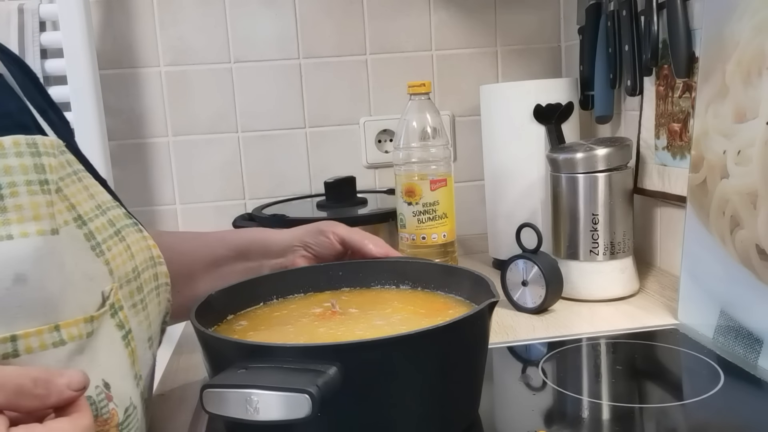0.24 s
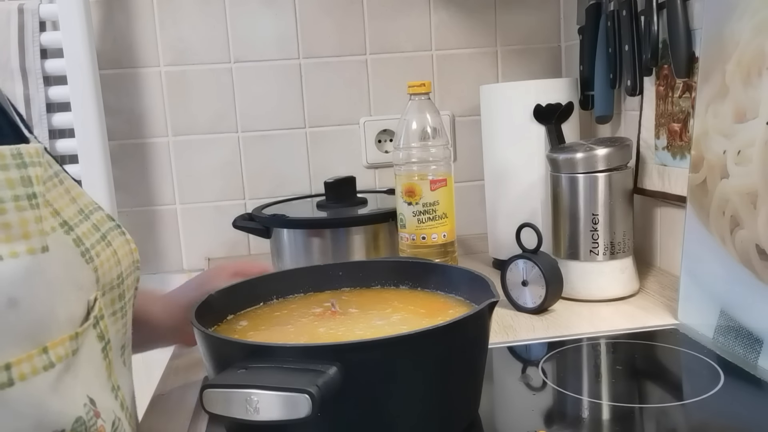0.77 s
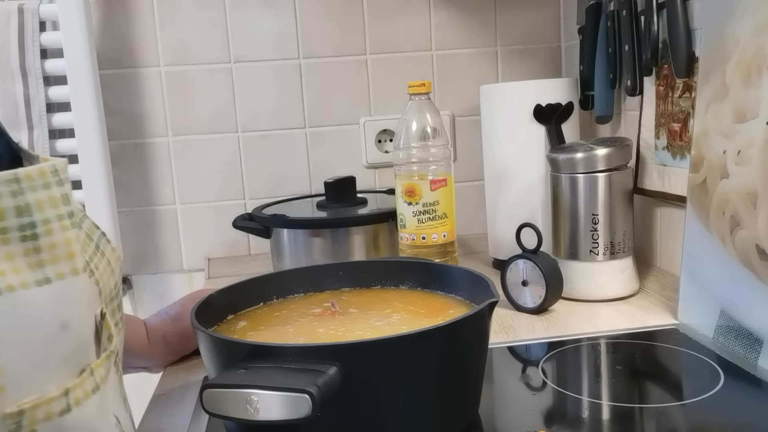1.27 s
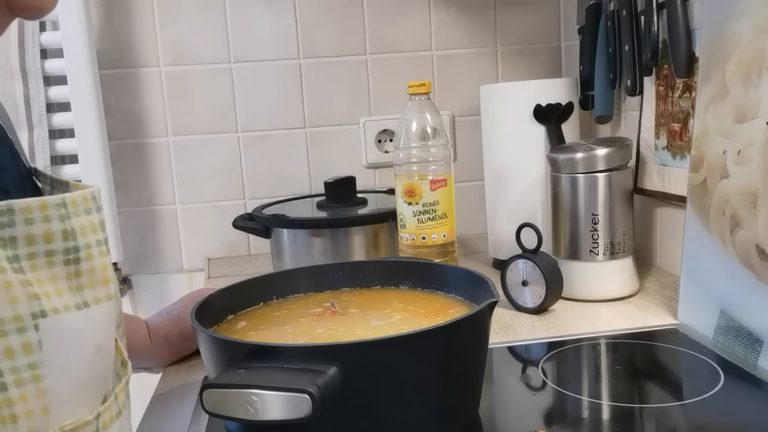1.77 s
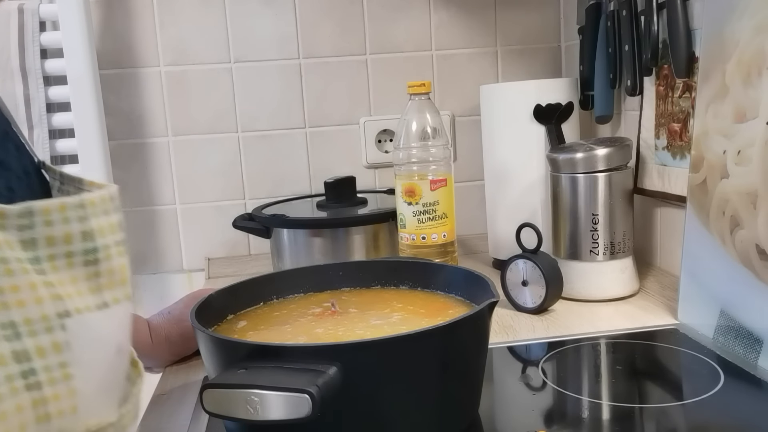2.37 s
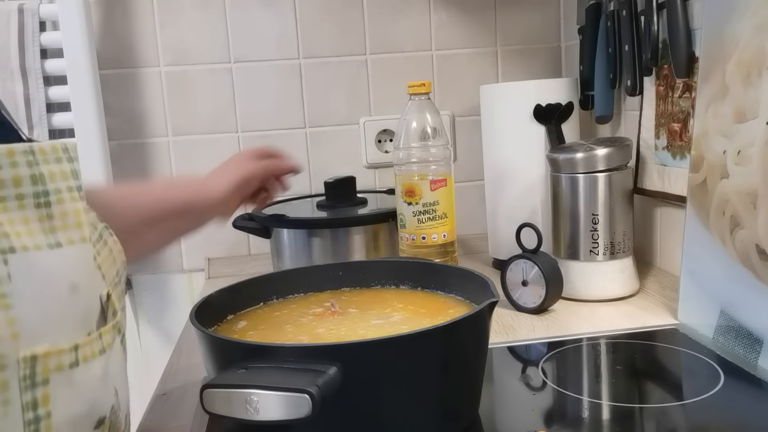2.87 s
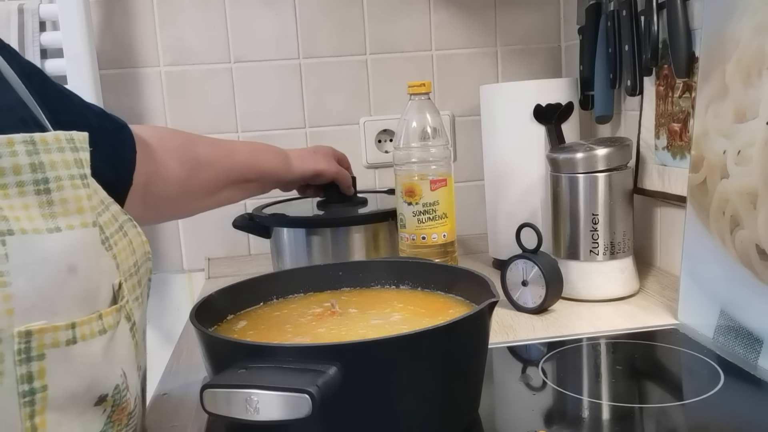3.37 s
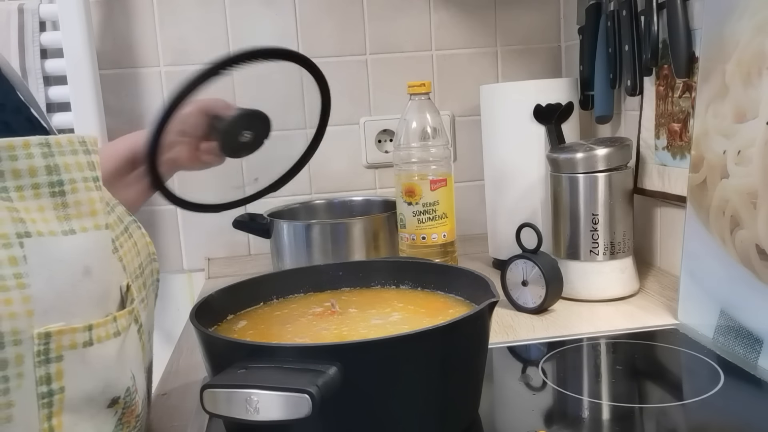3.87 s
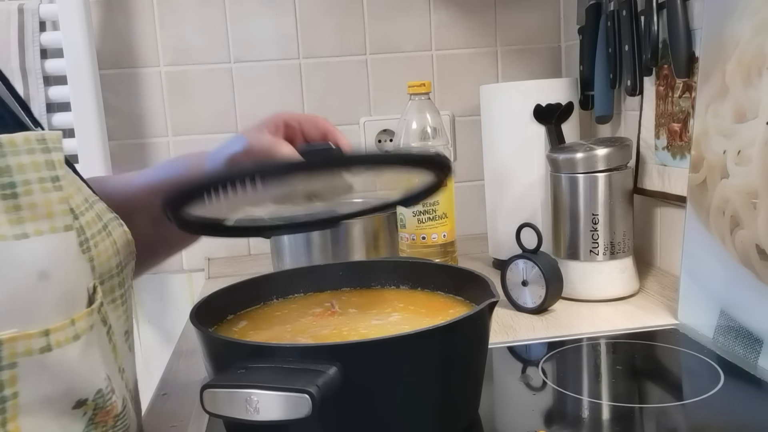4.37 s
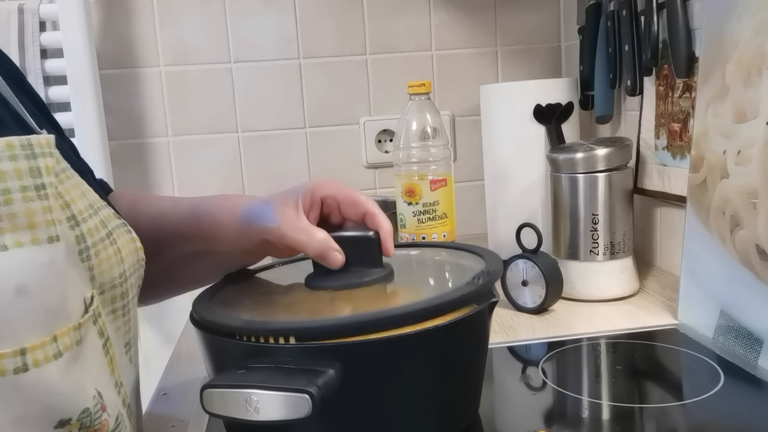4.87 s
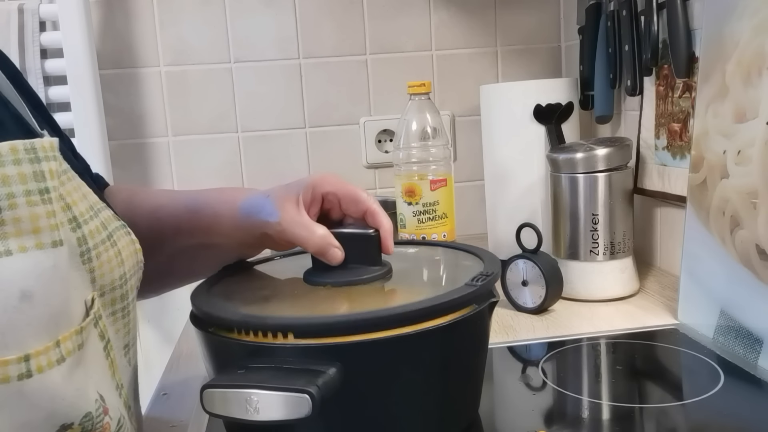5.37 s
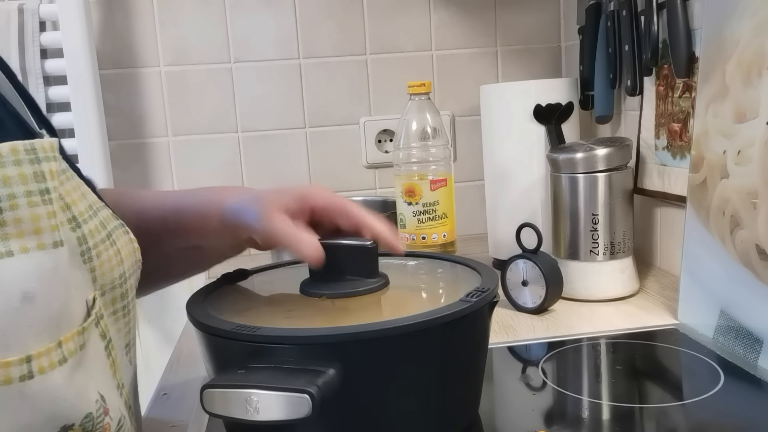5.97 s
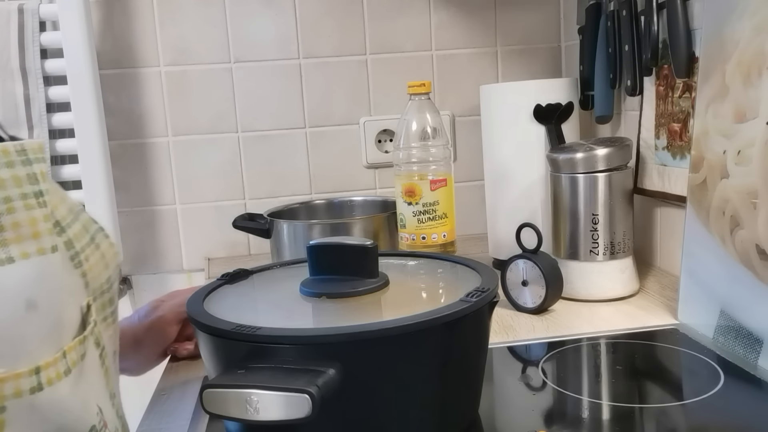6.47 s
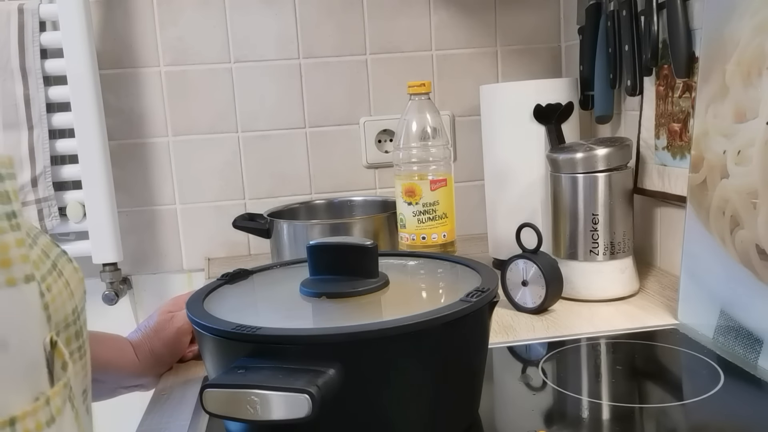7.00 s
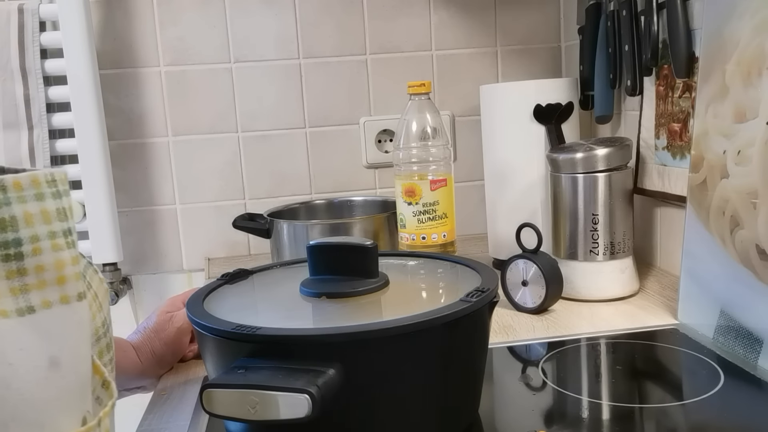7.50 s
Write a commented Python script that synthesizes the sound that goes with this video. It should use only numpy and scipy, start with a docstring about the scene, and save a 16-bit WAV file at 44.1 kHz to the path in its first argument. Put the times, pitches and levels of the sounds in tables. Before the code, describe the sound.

A small wind-up timer ticks faintly and steadily in a tiled home kitchen, over a low house rumble and a thin hiss. A few very soft bumps come early. About halfway through, a rubber-rimmed glass lid comes off a steel pot with a dull knock. It is lowered onto a pot of soup and settles with a few soft knocks and one louder thump. A small stereo microphone makes the ticks sound bright.

```python
"""Kitchen timer and pot lid

A wind-up timer ticks in a tiled kitchen, its clicks ringing its plastic case and metal works,
over the low rumble of the house and a thin hiss. A glass lid is lifted off one pot, lowered
over another and set down; its soft knocks make the pots ring, and the air under it hums.
A small microphone with two sound openings listens and adds a strong ring to the treble."""
import sys
import numpy as np
from scipy import signal
from scipy.fft import next_fast_len
from scipy.io import wavfile
from scipy.ndimage import uniform_filter1d

SR = 44100
rng = np.random.default_rng(int(sys.argv[2]) if len(sys.argv) > 2 else 0)


def waveform_to_disk(signal):
    """Save audio, clipped to [-1, 1], as 16-bit WAV at the path in sys.argv[1]."""
    frames = np.transpose(np.atleast_2d(signal))
    scaled = np.clip(frames, -1, 1) * 32767
    samples = np.round(scaled).astype(np.int16)
    wavfile.write(sys.argv[1], SR, samples)


N = 341334

# tones of the timer's metal works: (pitch [Hz], time to fade 60 dB [s], left [dB], right [dB])
METAL_TONES = [(5700, .016, -12, -12), (8800, .014, -9, -1), (9080, .018, -5, -9), (9700, .012, -5, -8),
               (11900, .05, -11, -12)]


def amp(db):
    return 10 ** (np.asarray(db) / 20)


def unit_level(x):
    return x / np.sqrt(np.mean(x ** 2) + 1e-20)


def at_pitch(table, hz, column=1):
    """Look up a table column at any frequency, on a log scale."""
    columns = np.transpose(table)
    return np.interp(np.log(hz + 1), np.log(columns[0] + 1), columns[column])


def over_time(table, column=1):
    """Stretch a table column to one value a sample."""
    columns = np.transpose(table)
    return np.interp(np.arange(N) / SR, columns[0], columns[column])


def add(mix, start_s, sound):
    part = mix[:, round(start_s * SR):][:, :sound.shape[-1]]
    part += sound[..., :part.shape[1]]


def resonate(x, hz, width_hz):
    """Keep a narrow band at unit level: shift hz down to zero, smooth twice, shift back."""
    turn = np.exp(2j * np.pi * np.cumsum(hz * np.ones(N)) / SR)
    pole = np.exp(-np.pi * width_hz / SR)
    once = signal.lfilter([1 - pole], [1, -pole], x / turn)
    return unit_level((turn * signal.lfilter([1 - pole], [1, -pole], once)).real)


def noise(shape_db, patchy_db):
    """Stereo noise with a given spectrum and drifting louder and softer patches."""
    # how alike the two channels are: (frequency [Hz], likeness [1 = the same])
    likeness = [(60, 0.95), (150, 1), (380, 0.52), (950, 0.46), (2380, -0.046), (5980, -0.18), (15000, 1)]
    frames, hz = N // 512 + 6, np.fft.rfftfreq(2048, 1 / SR)
    a, b, c, d, patches = rng.standard_normal((frames, 1025, 5), np.float32).T
    patches = unit_level(uniform_filter1d(uniform_filter1d(patches, 14, 0), 6, 1))
    same, left = at_pitch(likeness, hz)[:, None], a + 1j * b
    spectrum = np.array([left, same * left + np.sqrt(1 - same ** 2) * (c + 1j * d)])
    spectrum *= amp(shape_db(hz)[:, None] + patchy_db * patches)
    return unit_level(signal.istft(spectrum, nperseg=2048, noverlap=1536)[1][:, :N])


def waver(top_hz, count=30):
    """A slow random wobble: a sum of sine waves, the slower the stronger."""
    t = np.arange(0, N + 200, 200) / SR
    hz = np.geomspace(top_hz / 6, top_hz, count)[:, None]
    slow = (np.sin(2 * np.pi * (hz * t + rng.random((count, 1)))) / np.sqrt(hz)).sum(0)
    return np.interp(np.arange(N) / SR, t, unit_level(slow))


def house_rumble():
    """A broad rumble with fuzzy drones; mains hum, bass and middle each swell on their own."""
    # tone colour of the rumble: (frequency [Hz], relative level [dB])
    spectrum = [(15, -62), (25, -10.5), (49, -10.5), (71, -42.5), (108, -0.5), (208, -9.5), (278, -15.5),
                (371, -25.5), (409, -21), (649, -22.5), (883, -35.5), (1110, -39.5), (1600, -33),
                (2140, -60.5), (2500, -38.5), (3250, -37), (5500, -120)]
    # two bass drones, then three middle ones: (pitch [Hz], width [Hz], relative level [dB])
    drone_bands = [(102.5, 30, 1), (170.1, 11, -10.5), (279.7, 20.8, -0.5), (716.5, 30, -10.5),
                   (877, 79, -7)]
    # swell of the mains hum: (time [s], level [dB])
    hum_levels = [(0, -56), (0.4, -55.5), (0.6, -62.5), (0.8, -57.5), (1.4, -57), (1.6, -65), (2.0, -62),
                  (2.3, -58), (3.4, -68), (4.3, -60.5), (5.4, -58), (6.2, -58), (6.45, -66), (7.4, -54.5),
                  (7.74, -62)]
    # swell of the bass: (time [s], level [dB])
    bass_levels = [(0, -57.5), (0.26, -49.5), (0.36, -56.5), (0.9, -58), (1.1, -54), (1.2, -53.5),
                   (1.5, -58.5), (1.8, -49.5), (1.9, -52.5), (2.3, -54), (2.6, -56.5), (3.15, -56.5),
                   (3.3, -50.5), (3.4, -53.5), (3.67, -48.5), (3.85, -58.5), (3.98, -50.5), (4.25, -56),
                   (4.4, -51.5), (4.85, -59), (5.05, -55.5), (5.35, -52.5), (5.5, -66), (6.0, -57),
                   (6.6, -53.5), (6.76, -60), (6.96, -47.5), (7.05, -53.5), (7.74, -54.5)]
    # swell of the middle: (time [s], level [dB], level of its lowest drone [dB])
    middle_levels = [(0, -66.5, -70), (0.5, -69.5, -71), (1.3, -67.5, -65.5), (2.2, -68.5, -68),
                     (2.6, -68, -73.5), (3.9, -69.5, -72.5), (4.6, -67.5, -66), (4.85, -69, -70),
                     (5.15, -67.5, -66), (5.7, -67.5, -72), (6.0, -69.5, -63.5), (6.6, -70.5, -71.5),
                     (7.0, -69.5, -63), (7.74, -67.5, -64)]
    split_hz, mains_hz = 260, 50
    low = noise(lambda hz: at_pitch(spectrum, hz) - 40 * (hz > split_hz), patchy_db=3)
    middle = noise(lambda hz: at_pitch(spectrum, hz) - 60 * (hz <= split_hz), patchy_db=2.5)
    white = noise(np.zeros_like, patchy_db=2)
    drones = [resonate(white, hz, width) for hz, width, _ in drone_bands]
    # the lowest drone is a motor: it wavers in pitch more than in level
    motor_level = abs(signal.hilbert(drones[0].mean(0), next_fast_len(N))[:N])
    drones[0] = unit_level(drones[0] / (motor_level + 0.049) ** 0.48)
    drones = [amp(db) * drone for drone, (_, _, db) in zip(drones, drone_bands)]
    hum = amp(over_time(hum_levels)) * np.sqrt(2) * np.sin(2 * np.pi * mains_hz * np.arange(N) / SR)
    steady = amp(-60.5) * resonate(white, hz=65.5, width_hz=38)
    bass_gain = amp(over_time(bass_levels) + 1.78 * waver(top_hz=9))
    bass = bass_gain * (amp(-2.5) * low + drones[0] + drones[1])
    middle = amp(over_time(middle_levels)) * (amp(1.5) * middle + sum(drones[3:]))
    middle += amp(over_time(middle_levels, column=2)) * drones[2]
    return (hum + steady + bass + middle) * amp([[-.6], [.6]])


def hiss():
    """A thin hiss whose top end comes and goes, over steady circuit noise."""
    # swell of the hiss: (time [s], level [dB], share of its top end [dB])
    levels = [(0, -70.5, -10), (0.5, -73, -9), (0.75, -69.5, -5), (1.25, -66, -11), (1.59, -63.5, -3),
              (1.79, -68, -10), (2.7, -69, -9), (2.85, -66, -9), (3.8, -71, -8), (4.4, -69.5, -14),
              (4.9, -71.5, -8.5), (5.9, -72.5, -13), (6.1, -67.5, -13), (6.6, -71, -1.5), (6.94, -61, 0),
              (7.4, -70.5, -5), (7.74, -70, -7)]
    body = noise(lambda hz: -40 * (hz < 1500) - 14 * (hz > 10500), patchy_db=2.5)
    top = noise(lambda hz: -60 * (hz < 10500), patchy_db=1.5) * amp(over_time(levels, column=2))
    circuit = noise(lambda hz: at_pitch([(1000, 1), (12000, -5), (15000, -35)], hz), patchy_db=0)
    return amp(over_time(levels)) * (body + top) + amp(-74.5) * amp([[3], [-3]]) * circuit


def ring(tones, clicks, chance):
    """Each tone builds up while clicks feed it, then dies away; chance shifts its level."""
    t = np.arange(4400) / SR
    hz, fade_s, left_db, right_db = np.transpose(tones)[:, :, None]
    energy = signal.fftconvolve(amp(-120 * t / fade_s)[None], clicks[:, None] ** 2, axes=2)[..., :len(t)]
    swing = np.sqrt(abs(energy) / energy.max(2, keepdims=True))
    detune = 1 + 0.0075 * rng.standard_normal((len(tones), 1))
    phase = rng.random((2, len(tones), 1))
    gain = amp([left_db, right_db] + 1.83 * chance[:, None])
    return (gain * swing * np.sin(2 * np.pi * (hz * detune * t + phase))).sum(1)


def timer_ticks():
    """Each beat: a faint unlocking click, then a catch rattles on a wheel; case and works ring."""
    # tick and tock in turn: (time [s], level [dB], case ring [dB], works ring [dB])
    beats = [(0.0907, -54, -3.5, -9), (0.295, -54.5, -19, 5), (0.5173, -58.5, 3, 5.5),
             (0.7201, -55.5, 1.5, -2), (0.9424, -55.5, 2, 1.5), (1.1462, -53.5, -6, 9),
             (1.369, -53, -4, -3), (1.5738, -45.5, -25, -5), (1.7958, -49.5, 5.5, -5),
             (1.9988, -60.5, -1, 11), (2.2238, -57, 9, 7), (2.429, -55.5, 3, 7.5),
             (2.6494, -51.5, 3.5, -10), (2.857, -56.5, 1.5, 12.5), (3.0805, -57.5, 12.5, 3),
             (3.287, -59, 3, 10), (3.5103, -43.5, -1, -18), (3.7168, -52, -6, 8.5), (3.939, -54, 3, -0.5),
             (4.1503, -50.5, -5, -4), (4.3699, -55.5, 11.5, -1), (4.579, -54, -8, -27),
             (4.804, -56.5, 7, 1.5), (5.014, -51, -4, 2), (5.234, -55, 9.5, 1.5), (5.4442, -51.5, -9, 2),
             (5.6647, -45, 0.5, -14), (5.8731, -45.5, -12, -7), (6.096, -54, 1, -1), (6.3042, -51, -4, -29),
             (6.5274, -48.5, 1.5, -5), (6.7334, -51.5, -10, 2.5), (6.9563, -47, 1.5, 6),
             (7.1648, -46.5, -20, -13), (7.3891, -52.5, 8.5, -2), (7.5941, -52.5, -1, 9.5)]
    # tones of the plastic case: (pitch [Hz], time to fade 60 dB [s], left [dB], right [dB])
    case_tones = [(1645, .045, -22, -4), (1790, .04, -20, -6), (2455, .032, -2, -19), (3600, .02, -14, -17),
                  (4350, .02, -18, -10)]
    rattle_ms, lead_ms = (10.3, 6), (2.5, 1)  # (tick, tock); the rattle starts early by the lead
    usual_db, unlock_db, unlock_lead_s = -52.5, -13.5, .0235
    direct, to_room = np.zeros((2, N)), np.zeros((2, N))
    t = np.arange(900) / SR
    body_band = signal.butter(2, (2800, 11000), "bandpass", fs=SR)
    case_band = signal.butter(4, 1500, "highpass", fs=SR)
    top_band = signal.butter(4, 10800, "highpass", fs=SR)
    for k, (time_s, db, case_db, works_db) in enumerate(beats):
        grit, chance = rng.standard_normal((3, 900)), rng.standard_normal((2, 5))
        lead = lead_ms[k % 2] / 1000
        rise = np.minimum(t / (lead + .0006), 1) ** 2
        fall = np.exp(-t / 0.029) / (1 + np.exp((t - rattle_ms[k % 2] / 1000) / .0012))
        flicker = amp(1.5 * unit_level(uniform_filter1d(grit[2], 25)))
        clicks = (grit[:2] + 0.2 * grit[2]) * rise * fall * flicker
        clicks /= np.sqrt((clicks ** 2).sum(1, keepdims=True) / 300)
        works = amp(works_db) * ring(METAL_TONES, clicks, chance[0])
        case = amp(case_db) * signal.lfilter(*case_band, ring(case_tones, clicks, chance[1]))
        # stronger beats are duller and have a smaller share of echo
        top_gain, room_gain = amp(1.5 - 0.19 * (db - usual_db)), amp(-0.68 * (db - usual_db))
        beat = np.zeros_like(works)
        beat[:, :900] = signal.lfilter(*body_band, clicks) + top_gain * signal.lfilter(*top_band, clicks)
        carried = beat + amp(-28) * case + amp(-12) * works  # rings carry less far than clicks
        add(to_room, time_s - lead, amp(db) * room_gain * carried)
        add(direct, time_s - lead, amp(db) * (beat + case + works))
        add(direct, time_s - unlock_lead_s, amp(db + unlock_db) * (beat + works + 0.59 * case))
    return direct + amp(6.5) * kitchen_echo(to_room)


def kitchen_echo(x):
    """Quick echoes off nearby tiles and jars, then the room, each band fading at its own speed."""
    # the room's echo: (frequency [Hz], time to fade 60 dB [s], relative level [dB])
    bands = [(1500, 0.7, 10.5), (4900, 0.36, -1), (8960, 0.83, 1), (12800, 0.33, 0), (15600, 0.67, -13)]
    hz, t, spectrum = signal.stft(rng.standard_normal((2, SR)), SR, nperseg=128)
    room = amp(at_pitch(bands, hz, column=2)[:, None] - 60 * t / at_pitch(bands, hz)[:, None])
    nearby = amp(-1.5 - 60 * t / 0.14)
    tail = signal.istft(spectrum * (room + nearby), SR, nperseg=128)[1]
    return signal.fftconvolve(x, tail / np.linalg.norm(tail[0]), axes=1)[:, :N]


def lid_knocks(knocks, pot_tones):
    """The lid's rubber rim gives a soft push: pot and hob swell and ring; the rim adds a dry clack."""
    out, t = np.zeros((2, N)), np.arange(16000) / SR
    hz, tone_db, fade_s = np.transpose(pot_tones)[:, :, None]
    apart = np.clip(hz / 500, 0, 1)  # higher tones differ more between left and right
    for time_s, db, rise_ms, bass_db, clack_db, clack_hz, stretch in knocks:
        swell = 1 - np.exp(-(t / (rise_ms / 1000)) ** 2)
        fade_db = -60 * t / (stretch * fade_s)
        fade = amp(2 * fade_db) + 0.42 * amp(fade_db)  # the hand damps the first swing
        tones = amp(tone_db + bass_db * (hz < 150)) * fade * np.sin(2 * np.pi * hz * t)
        # nearby tones and echoes make each ring flutter, more so late on
        wobble = uniform_filter1d(rng.standard_normal((3, len(pot_tones), 1600)), size=90)
        shared, left, right = unit_level(uniform_filter1d(wobble.repeat(10, 2), size=10))
        flutter = 0.46 * np.minimum(t / 0.14, 1) * (shared + apart * np.array([left, right]))
        grit = rng.standard_normal((2, len(t))) * amp(-60 * t / (0.19 * stretch))
        band = signal.butter(3, (clack_hz / 1.55, clack_hz * 1.55), "bandpass", fs=SR, output="sos")
        sound = amp(clack_db) * signal.sosfilt(band, grit) - ((1 + flutter) * tones).sum(1)
        add(out, time_s, amp([[db - 1.2], [db + 1.2]]) * swell * sound)
    return out


def spring_slip():
    """The timer's spring slips and keeps the metal works buzzing for a moment."""
    # slips of the spring: (time [s], level [dB], length [s])
    slips = [(1.407, -54.5, 0.065)]
    out = np.zeros((2, N))
    for time_s, db, length_s in slips:
        buzz = rng.standard_normal((2, 4000)) * (np.arange(4000) < length_s * SR)
        stutter = unit_level(uniform_filter1d(rng.standard_normal((2, 4400)), size=70))
        add(out, time_s, amp(db) * stutter * ring(METAL_TONES, buzz, np.array([-2, 1, -0.5, -2.5, 6])))
    return out


def air_under_lid():
    """Room noise rings in the air between lid and soup; the pitch follows the gap."""
    # the air's note as the lid sinks, lifts a little and sinks again: (time [s], pitch [Hz], level [dB])
    note = [(4.45, 690, -69), (4.7, 694, -77), (4.8, 676, -65.5), (4.88, 650, -74), (4.94, 580, -62),
            (5.03, 476, -58), (5.15, 500, -55.5), (5.19, 515, -66), (5.38, 602, -66.5), (5.52, 570, -77)]
    white, hz = rng.standard_normal(N), over_time(note)
    t = np.arange(N) / SR
    gate = np.clip((t - note[0][0]) / 0.06, 0, 1) * np.clip((note[-1][0] - t) / .05, 0, 1)
    lower = amp(over_time(note, column=2)) * resonate(white, hz, width_hz=71)
    upper = amp(-82) * resonate(white, hz + 550, width_hz=51)
    return gate * (lower + upper)


def scene():
    """Mix the house, the lid on its two pots, the timer and the hiss."""
    # hand and lid knock on pot and hob: (time [s], level [dB], rise [ms], boost under 150 Hz [dB],
    # rim clack [dB], clack pitch [Hz], stretch of the fade time [factor])
    knocks = [(1.049, -48, 16.6, 7.5, 9.5, 990, 0.79), (1.402, -57.5, 8.8, -4, 17, 1080, 0.98),
              (1.831, -60, 5.3, -18, 19, 720, 0.85), (1.89, -52.5, 6.5, 1, 10.5, 570, 1.24),
              (2.18, -48.5, 7.9, -26, 9.5, 576, 0.74), (4.33, -53.5, 12, -17, 22.5, 530, 0.63),
              (4.975, -46, 15, -6, -16, 600, 1.17), (5.514, -36.5, 19.5, 9.5, -22, 545, 0.84),
              (5.637, -35.5, 14, -2, -8, 950, 0.81), (5.673, -29.5, 8.2, -12, -26, 950, 0.7),
              (5.703, -9.5, 13.2, -6, -32, 1000, 0.34), (5.71, -60, 2.1, 25, 24.5, 2280, 0.24),
              (5.727, -29.5, 2.9, -2.5, -18, 500, 1.4)]
    # the lid sticks and lets go as it comes off the steel pot behind: columns as for the knocks
    lifts = [(3.431, -22, 34.5, -20, 2, 495, 0.82), (3.452, -61, 11, -8, 16, 600, 0.31),
             (3.5, -34.5, 4.5, -17, -4, 453, 0.9), (3.54, -42.5, 16, -20, 9, 480, 0.87)]
    # tones of the pot and the hob under it: (pitch [Hz], level [dB], base fade time [s])
    pot_tones = [(64, 5, 0.11), (107.1, 5.5, 0.41), (125.5, -2, 0.4), (178.8, -1.5, 0.52), (210.5, 0, 0.15),
                 (280.3, -14, 0.36), (380.6, -11, 0.22), (454, -14, 0.14), (520, -7, 0.048),
                 (975, -41, 0.52), (2200, -27, 0.12)]
    # tones of the steel pot: (pitch [Hz], level [dB], base fade time [s])
    steel_tones = [(112.7, 0, .5), (182.2, 1.5, 0.44), (198.5, 7, 0.12), (259.7, -13, 0.4),
                   (405, -15, 0.27), (448, -11.5, 0.19), (537, -10, 0.12)]
    low = house_rumble() + air_under_lid()
    low += lid_knocks(knocks, pot_tones) + lid_knocks(lifts, steel_tones)
    return low + timer_ticks() + spring_slip() + hiss()


def record(dry):
    """The microphone's openings ring and colour the treble; the deepest bass and very top are cut."""
    # tone colour of the two openings: (frequency [Hz], left [dB], right [dB])
    openings = [(1150, -2, -2), (2126, -9, -12.5), (3610, -16, -16), (5670, -6, -8), (6220, -10.5, -15),
                (7370, -40, -16), (8380, -1.5, -8.5), (9110, -5, -1), (8680, 6, 3), (9900, -3, -11.5),
                (10500, -8, -14), (12840, -2.5, -8), (15600, -2.5, -12)]
    hz = np.fft.rfftfreq(1024, 1 / SR)
    log_gain = np.log(amp([at_pitch(openings, hz, column=1), at_pitch(openings, hz, column=2)]))
    mirrored = np.concatenate([log_gain, log_gain[:, -2:0:-1]], 1)
    # a filter that rings only after a sound, never before it (minimum phase)
    taps = np.fft.ifft(np.exp(np.conj(signal.hilbert(mirrored, axis=1))), axis=1).real
    coloured = signal.oaconvolve(dry, taps[:, :512], axes=1)[:, :N]
    bass_cut = signal.butter(4, 42, "highpass", fs=SR, output="sos")
    top_cut = signal.firwin(511, 15900, window=("kaiser", 9), fs=SR)
    return signal.oaconvolve(signal.sosfilt(bass_cut, coloured), top_cut[None], "same")


dry = scene()
out = record(dry)
waveform_to_disk(out)
```